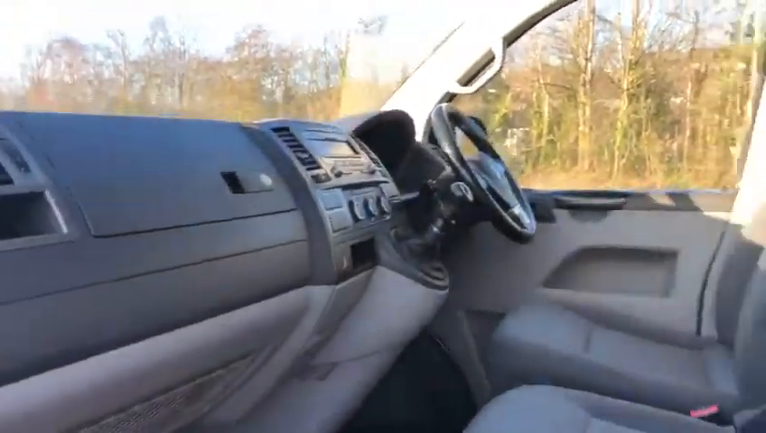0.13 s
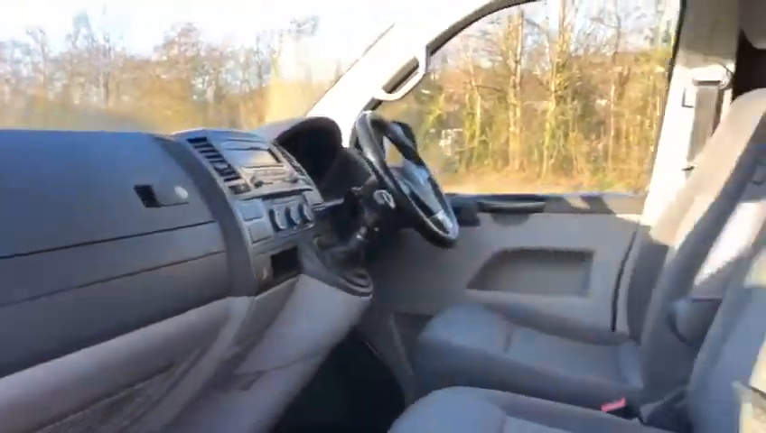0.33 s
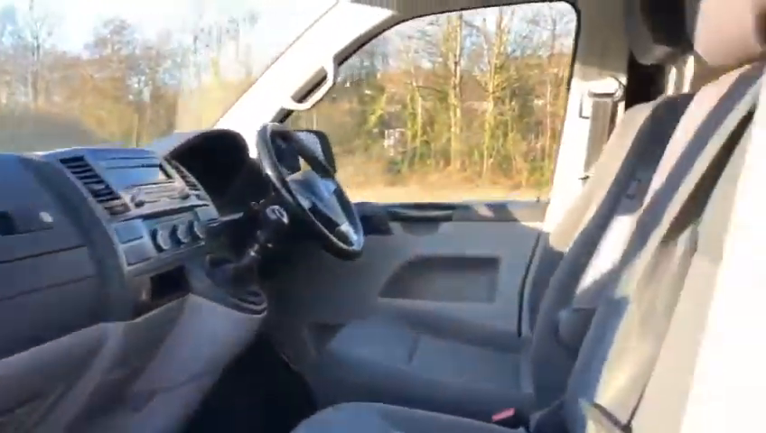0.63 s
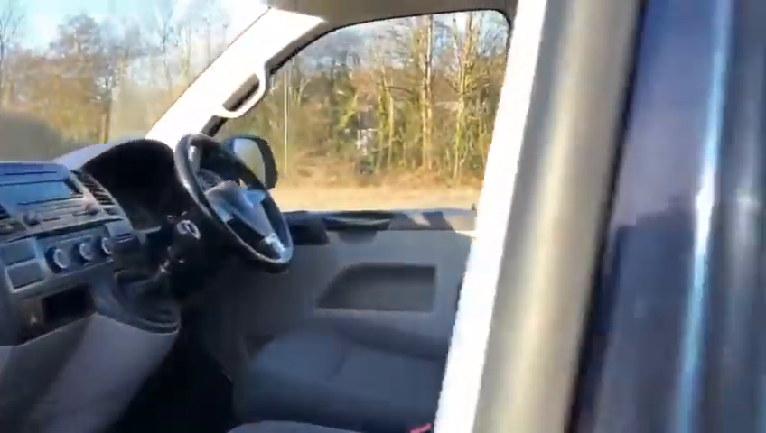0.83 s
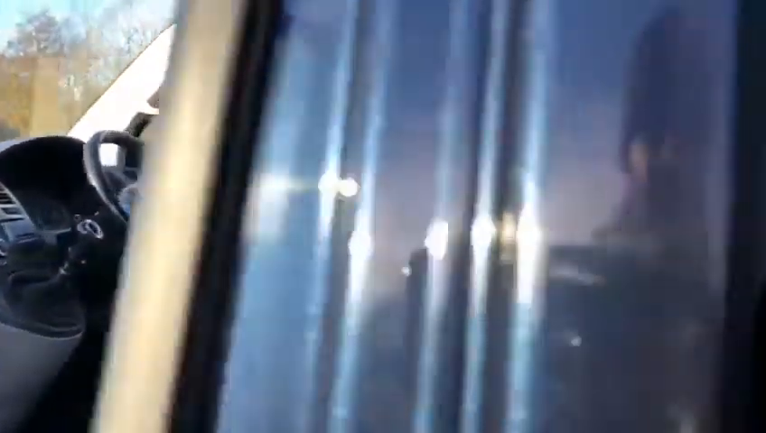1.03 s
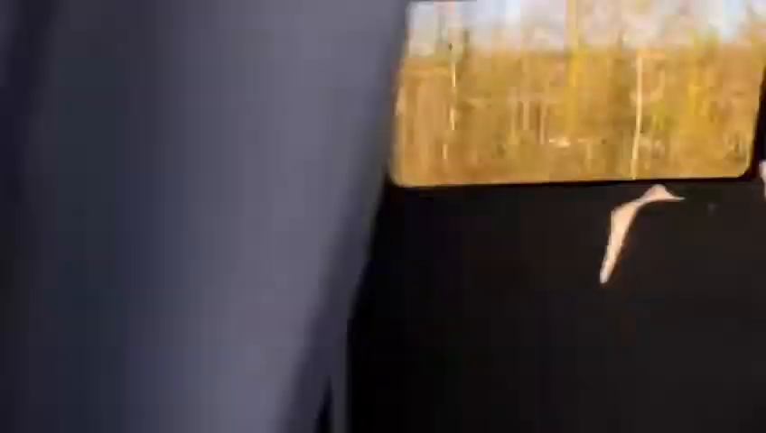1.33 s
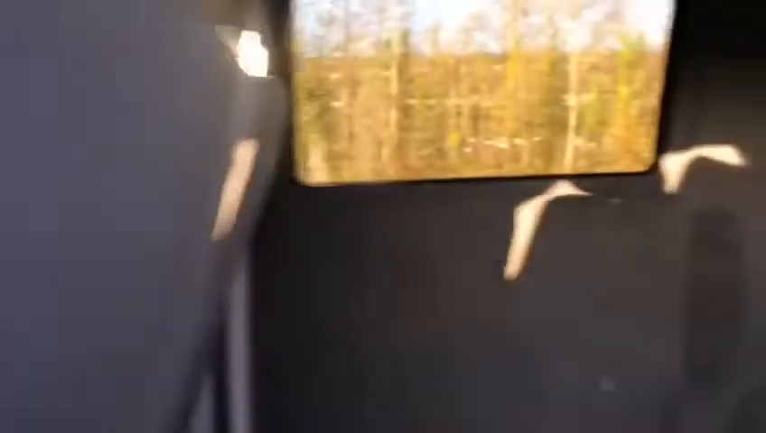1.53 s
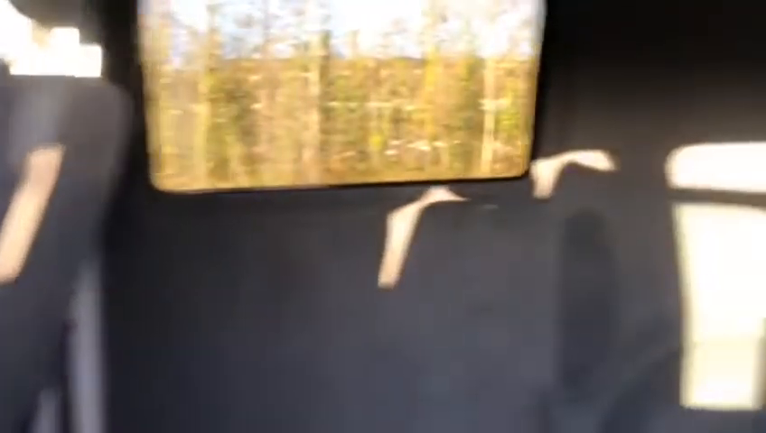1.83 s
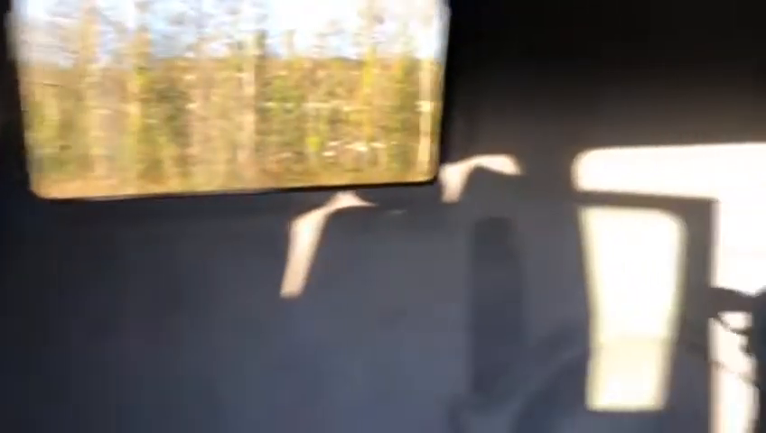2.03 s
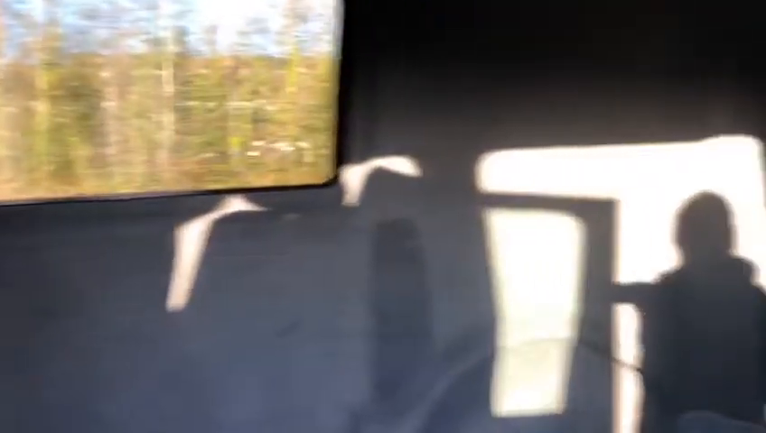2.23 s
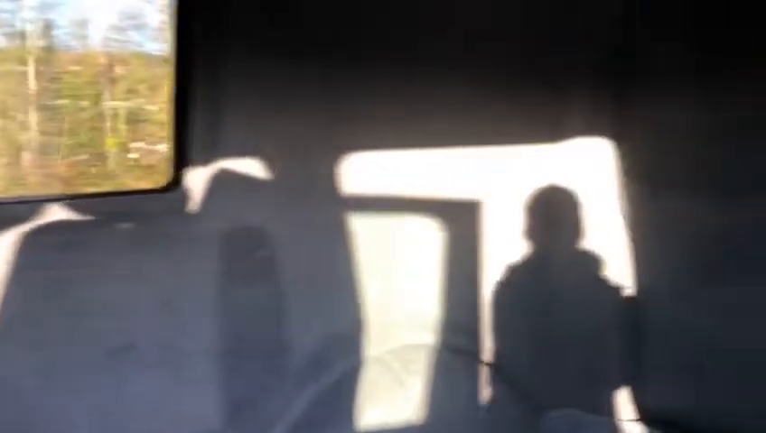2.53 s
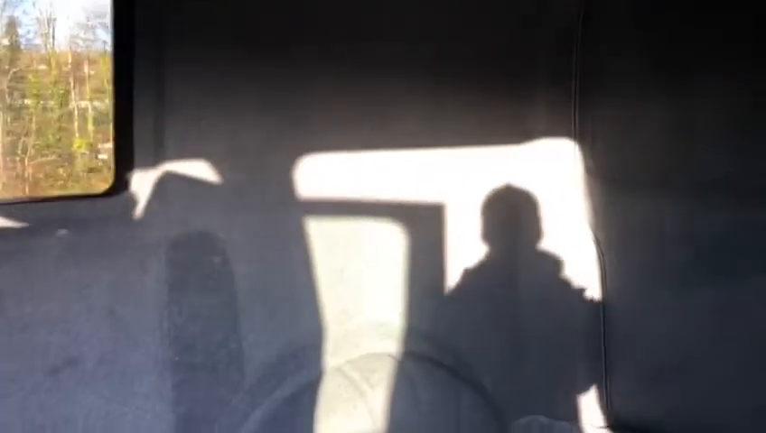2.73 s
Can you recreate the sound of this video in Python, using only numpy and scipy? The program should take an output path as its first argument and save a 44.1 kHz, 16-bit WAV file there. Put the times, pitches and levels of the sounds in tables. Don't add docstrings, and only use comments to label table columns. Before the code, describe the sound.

A van's sliding side door clunks free loudly, then rumbles along its runners with a squeal

```python
import sys
import numpy as np
from scipy import signal
from scipy.fft import rfft, irfft, next_fast_len
from scipy.io import wavfile
from scipy.ndimage import map_coordinates

SR = 44100
rng = np.random.default_rng(int(sys.argv[2]) if len(sys.argv) > 2 else 0)


def volts(x):
    e = np.asarray(x, float) / 20
    return 10 ** e


def store_wav(level_fs):
    pcm = np.round(np.clip(np.atleast_2d(level_fs), -1, 1) * 32767)
    wavfile.write(sys.argv[1], SR, pcm.T.astype(np.int16))


N = 127890

# (frequency [Hz], density [dB per Hz])
AIR_SPECTRUM = [(30, -9.5), (62, -9.5), (300, -25.5), (1360, -28.5), (10300, -56.5), (12000, -52)]
AIR_DB = -46.5

# (middle [s], length [s], level [dB])
CLATTER_BURSTS = [
    (2.47, .05, -41),
    (2.53, .04, -36),
    (2.57, .05, -38),
    (2.62, .08, -39),
    (2.7, .1, -48),
    (.285, .04, -25),
    (.32, .06, -30),
    (1.3, .5, -37),
]
# (frequency [Hz], width [Hz], level [dB])
TRIM_MODES = [(464, 144, 4), (585, 120, 3.5), (760, 260, -3), (1016, 91, -0.5)]
KNOCKS_PER_S = 500

# (middle [s], length [s], pitch [Hz],
# level [dB])
WHISTLES = [(2.403, .03, 10230, -33), (2.418, .04, 2580, -42), (2.41, .02, 5110, -53),
            (2.39, .03, 2450, -49), (2.393, .035, 3950, -47), (2.372, .06, 8900, -49),
            (2.39, .03, 5800, -57), (2.365, .03, 2250, -50), (2.41, .05, 8900, -54),
            (.066, .008, 1190, -33), (2.283, .025, 3750, -53), (.032, .02, 600, -36), (.108, .02, 600, -35),
            (.458, .01, 680, -29), (.277, .008, 1650, -20), (2.575, .025, 3350, -53),
            (2.536, .006, 6200, -50), (1.329, .008, 980, -22), (2.524, .01, 800, -29),
            (.279, .01, 950, -19), (.768, .008, 1300, -38), (.24, .012, 1400, -22)]
# (middle [s], length [s], level [dB])
RASP_BURSTS = [
    (2.39, .12, -53),
    (.15, .16, -54),
    (.79, .08, -56),
    (2.58, .2, -55),
]

# (time [s], peak [dB], low part over it [dB], high part over it [dB], T60
# [s])
TICKS = [(0.0196, -36.5, 8.5, 0.5, 0.045), (0.0277, -46, 20.5, -12.5, 0.014),
         (0.099, -41.5, 20.5, -7, 0.062), (0.2117, -31.5, 4, -14, 0.058),
         (0.215, -14.5, 2.5, -8, 0.089), (.2178, -11.5, -1, -2.5, 0.015),
         (0.2774, -41.5, 7, -5, 0.068), (0.301, -38, -16, 13, 0.056),
         (0.3234, -33.5, -16, -20.5, 0.038), (0.408, -46, -5, -17, 0.033), (.417, -53, -15, 8, 0.15),
         (0.4248, -56, 2, 9, 0.2), (0.4555, -50, 21.5, 1, 0.059), (.463, -44, 2, -3, .05),
         (.566, -59, 0, 5, .03), (0.604, -63, 0, 6, 0.026), (0.6557, -50, 7.5, -7.5, 0.12),
         (.663, -50, 0, 4, .04), (0.705, -52, -4, 2, .04), (.766, -46, 14.5, -2, 0.043),
         (.795, -54, -10, 10, .06), (0.814, -47, -6, 7, 0.033), (0.727, -45.5, 14, -2, 0.03),
         (0.7556, -36, -10, -18, 0.042), (0.8239, -28, 10.5, -7, 0.077), (1.0695, -37, 0, -27, 0.22),
         (1.1387, -32.5, 6, 0, 0.0096), (1.326, -32.5, 17.5, -8, 0.051),
         (1.5946, -48, -7, 4.5, 0.023), (1.6523, -38, 6, -5, 0.058), (1.714, -50.5, 17.5, 3, 0.045),
              (1.9854, -53, -4, 6.5, 0.078), (2.01, -43, -4, -6, 0.087), (2.165, -47.5, 9, 3, 0.046),
              (2.2165, -40, 6, 0.5, .06), (2.277, -37, -1, -18, 0.054), (2.3378, -40.5, 14, -4, 0.032),
              (2.3449, -32, 6, 3, 0.054), (2.412, -30.5, 2, -20, .03), (2.4313, -35.5, 6.5, -4, 0.12),
              (2.46, -44, -11, 3, .02), (2.4655, -25, 0.5, 6.5, 0.035), (2.5207, -40, 12, -1, 0.037),
              (2.5344, -35, 8, -19, 0.05), (2.55, -41, 11, -16, .03), (2.5603, -35, 13.5, -12, 0.066),
              (2.59, -31.5, 8.5, -19, 0.054), (2.6363, -38, 10.5, -32, 0.049),
              (2.6459, -36.5, 5, -31, 0.06)]
# (centre [Hz], width [Hz])
TICK_PARTS = [(2850, 3750), (880, 1570), (7640, 9200)]
TAIL_DB, TAIL_STRETCH, CRACK_T60_S, TICK_DB = -9.5, 2.36, 0.0049, -11

# (start [s], length [s], level [dB], squeal pitch [Hz], squeal over the rub [dB])
CATCHES = [(1.069, 0.035, -48, 1700, -11), (1.12, 0.066, -39.5, 1770, -23), (1.193, 0.035, -32, 1900, -6),
           (1.215, 0.038, -34, 1870, 11), (1.269, 0.045, -33, 1820, 3.5), (1.284, 0.022, -37, 1575, 9),
           (1.305, 0.036, -33.5, 1705, 0.5), (1.364, 0.034, -35.5, 1860, 5.5),
           (1.41, 0.027, -39.5, 1840, -5), (1.445, 0.034, -36, 1630, 2.5), (1.51, 0.046, -42, 1590, -13)]
# (frequency [Hz], density [dB per Hz])
RUB_SPECTRUM = [(300, -28), (600, 7), (1700, 3.5), (2500, -10), (3300, -2), (4800, -14.5), (8500, -17),
                (12000, -23)]
# (frequency [Hz], width [Hz], level [dB])
BRACKET_MODES = [(1540, 120, 1), (1860, 150, 7.5), (2140, 120, 11), (3050, 120, 7.5), (3800, 210, 0)]
SQUEAL_HARMONICS = [2.5, -12.5, -38, -25]
SQUEAL_JITTER, SQUEAL_ROUGHNESS = 0.012, 0.5
DRAG_S, DRAG_LENGTH_S, DRAG_DB = 1.37, 0.49, -40.5
BITE_S, FADE_S, GRIT_DB = 0.0038, 0.018, 3

# (time [s], level [dB])
DOOR_BLOWS = [(0.216, -15), (.229, -7.5), (0.24, -16), (0.251, -14), (.266, -14), (.277, -10.5),
              (0.283, -14), (.298, -23), (0.311, -29), (.325, -18), (0.824, -23), (2.469, -22.5),
              (2.522, -53), (2.561, -23.5)]
# (frequency [Hz], level [dB])
DOOR_MODES = [(75, -2), (117, -6.5), (140, -10), (180, -10.5), (255, -5), (301, -7), (366, -8.5),
              (463, -12.5)]
# (frequency [Hz], density [dB per Hz])
CRUNCH_SPECTRUM = [(300, -26), (600, 10), (1100, -2), (1700, -5.5), (2400, -18), (5000, -38)]
DOOR_T60_S, CRUNCH_T60_S, CRUNCH_DB = 0.14, 0.12, -9.5
BOOM_S, BOOM_HZ, BOOM_DB, BOOM_RISE_S, BOOM_T60_S = 0.2235, 41.5, 2, 0.039, 0.4

# (time [s], roller force [dB], load bay drumming over it [dB], body sway over it [dB])
ROLL_COURSE = [(0, -57.5, -6, 0), (0.031, -38.5, -18, -9), (0.198, -37.5, -6, -1), (.38, -33.5, 5, 8.5),
               (.52, -36.5, -22, 10), (0.661, -30, -6.5, -7), (.8, -29.5, 6, 2), (.95, -30.5, 2.5, 6),
               (1.2, -26, -3, -16), (1.45, -25.5, 7.5, -27), (1.75, -31, 5.5, -8), (1.98, -28.5, 5, -9),
               (2.15, -30.5, 0.5, -1), (2.28, -31, 13, -3), (2.5, -32, 5, 7.5), (2.64, -35, 8, 7),
               (2.76, -44, 2.5, 12.5), (2.9, -59.5, 11, 19.5)]
# (frequency [Hz], density [dB per Hz])
PANEL_SPECTRUM = [(90, -6), (165, -3.5), (255, -10.5), (520, -10.5), (640, -17.5), (2000, -36),
                  (5000, -49.5), (12000, -58.5)]
# (frequency [Hz], width [Hz], level [dB])
PANEL_MODES = [(255, 57, -2), (770, 135, -5.5), (3430, 200, -28)]
# (frequency [Hz], width [Hz], level [dB])
BAY_MODES = [(113.5, 22.4, 4.5), (135.7, 10.3, -1)]
# (frequency [Hz], width [Hz], level [dB])
SWAY_MODES = [(38, 6.9, -12), (69, 46, -12.5)]
BUMPS_PER_S, BUMP_SPREAD_DB, LUMP_DB = 2500, 2.5, 0.9
SHIFT_DB = 3


def unit(x):
    return x / np.sqrt(np.mean(x ** 2) + 1e-20)


def noise():
    return rng.standard_normal(N)


def wobble(rate):
    knots = rng.standard_normal(int(N * rate / SR) + 4)
    return map_coordinates(knots, [np.arange(N) * rate / SR])


def filtered(x, response):
    m = next_fast_len(x.shape[-1] + SR // 2)
    spectrum = rfft(x, m) * response(np.fft.rfftfreq(m, 1 / SR))
    return irfft(spectrum, m)[..., :x.shape[-1]]


def colour(points):
    f, db = np.transpose(points)
    return lambda hz: volts(np.interp(np.log(hz + 1), np.log(f + 1), db))


def peaks(rows):
    def response(f):
        return sum((-1) ** k * volts(db) * 1j * f * width / (hz * hz - f * f + 1j * f * width)
                   for k, (hz, width, db) in enumerate(rows))
    return response


def swell(middle, length):
    return np.exp(-2 * ((np.arange(N) / SR - middle) / (length / 2)) ** 2)


def car_park_air():
    return volts(AIR_DB + 0.21 * wobble(5.4)) * unit(filtered(noise(), colour(AIR_SPECTRUM)))


def clatter():
    taps = (rng.random(N) < KNOCKS_PER_S / SR) * noise()
    strike = unit(taps) + 0.6 * noise()
    knocks = unit(filtered(strike, lambda f: peaks(TRIM_MODES)(f) * peaks([(800, 1200, 0)])(f)))
    return knocks * sum(volts(db) * swell(s, length) for s, length, db in CLATTER_BURSTS)


def squeaks():
    drift = np.cumsum(1 + 0.006 * wobble(150)) / SR
    whistles = np.zeros(N)
    for s, length, hz, db in WHISTLES:
        roughness = unit(1 + 0.7 * wobble(300))
        whistles += volts(db) * swell(s, length) * roughness * np.sin(2 * np.pi * hz * drift)
    rasp = unit(filtered(noise(), peaks([(2200, 1500, 0), (4300, 400, -6), (7500, 5000, -12)])))
    grain = volts(2.2 * wobble(90))
    return whistles + grain * rasp * sum(volts(db) * swell(s, length) for s, length, db in RASP_BURSTS)


def ticks():
    out, t = np.zeros(N + SR), np.arange(SR // 6) / SR
    for s, db, low_db, high_db, t60 in TICKS:
        t60 = max(t60, 0.01)
        tail = volts(TAIL_DB - 60 * t / (TAIL_STRETCH * t60))
        crack = 3 * volts(-60 * t / CRACK_T60_S)
        shape = volts(-60 * t / t60) + tail + crack
        shape = shape * (1 - np.exp(-t / 0.0006))
        rings = peaks([(hz, hz / 12, 1.5) for hz in 600 * 16 ** rng.random(7)])
        parts = []
        for hz, width in TICK_PARTS:
            hiss = rng.standard_normal(len(t)) * shape
            parts.append(filtered(hiss, lambda f: peaks([(hz, width, 0)])(f) ** 3
                                  * np.sqrt(SR / width) * (0.87 + rings(f))))
        out[round(s * SR):][:len(t)] += volts(db + TICK_DB) * (volts([0, low_db, high_db]) @ parts)
    return out[:N]


def grind(rings):
    grit = noise() * volts(GRIT_DB * wobble(350))
    return unit(filtered(grit, lambda f: colour(RUB_SPECTRUM)(f) * (1 + abs(peaks(BRACKET_MODES + rings)(f)))))


def dry_roller():
    t = np.arange(N) / SR
    drift = 1 + SQUEAL_JITTER * wobble(300)
    lumps = [unit(1 + SQUEAL_ROUGHNESS * wobble(200)) for _ in SQUEAL_HARMONICS]
    out = volts(DRAG_DB + 1.5 * wobble(45.0)) * swell(DRAG_S, DRAG_LENGTH_S) * grind([])
    scrapes = []
    for _ in range(4):
        ring_hz = [8650, *rng.uniform(5000, 10000, size=3)]
        scrapes.append(grind([(hz, 200, 6) for hz in ring_hz]))
    for k, (s, length, db, hz, squeal_db) in enumerate(CATCHES):
        phase = 2 * np.pi * np.cumsum(hz * drift) / SR
        squeal = sum(volts(level) * lumps[j] * np.sin((j + 1) * phase)
                     for j, level in enumerate(SQUEAL_HARMONICS))
        bite = np.clip((t - s) / BITE_S, 0, 1) * np.exp(-np.clip(t - s - length, 0, None) / FADE_S)
        slip = swell(s + length / 2, 1.6 * length) * volts(squeal_db)
        out += volts(db) * (bite * scrapes[k % 4] + slip * squeal)
    return out


def clunk():
    out, t = np.zeros(N + SR), np.arange(SR) / SR
    for s, db in DOOR_BLOWS:
        ring = np.zeros(SR)
        for hz, level in DOOR_MODES:
            decay = volts(level + rng.normal(0, 5.1) - 60 * t / DOOR_T60_S)
            ring += decay * np.sin(2 * np.pi * hz * rng.normal(1, 0.033) * t) * rng.choice([-1, 1])
        rubble = unit(filtered(rng.standard_normal(SR), colour(CRUNCH_SPECTRUM)))
        crunch = volts(CRUNCH_DB - 60 * t / CRUNCH_T60_S) * rubble
        out[round(s * SR):][:SR] += volts(db) * (ring + crunch)
    boom = volts(BOOM_DB - 60 * t / BOOM_T60_S) * (1 - np.exp(-(t / BOOM_RISE_S) ** 2))
    out[round(BOOM_S * SR):][:SR] += boom * np.sin(2 * np.pi * BOOM_HZ * t)
    return out[:N]


def rolling():
    s, force_db, bay_db, sway_db = np.transpose(ROLL_COURSE)

    def course(db):
        return volts(np.interp(np.arange(N) / SR, s, db))

    bumps = (rng.random(N) < BUMPS_PER_S / SR) * noise() * volts(BUMP_SPREAD_DB * noise())
    bumps = unit(bumps) + 0.85 * noise()
    plain = filtered(bumps, lambda f: colour(PANEL_SPECTRUM)(f) * (1 + abs(peaks(PANEL_MODES)(f))))
    panel = plain
    for _ in range(3):
        mode_hz = 235 * 2.35 ** np.sort(rng.random(12))[::2]
        place = filtered(plain, peaks([(hz, 14, 1) for hz in mode_hz]))
        panel = panel + volts(SHIFT_DB * wobble(5.03)) * place
    panel = volts(3.5 + LUMP_DB * wobble(13.9)) * unit(panel)
    bay = unit(filtered(noise(), lambda f: peaks(BAY_MODES)(f) * peaks([(120, 60, 0)])(f)))
    sway = unit(filtered(noise(), lambda f: peaks(SWAY_MODES)(f) * peaks([(48, 50, 0)])(f)))
    return course(force_db) * (panel + course(bay_db) * volts(0.5) * bay + course(sway_db) * volts(-2.0) * sway)


def scene():
    return (car_park_air() + clatter() + squeaks() + ticks() + dry_roller() + clunk() + rolling())[None]


def band_limit(x):
    return signal.sosfilt(signal.butter(12, 12290, fs=SR, output="sos"), x)


def record(dry):
    clipped = dry / (1 + abs(dry / 0.95) ** 6) ** (1 / 6)
    mix = filtered(clipped, lambda hz: np.clip((12250 - hz) / 1000, 0, 1) ** 1.8)
    return band_limit(mix)


dry = scene()
out = record(dry)
store_wav(out)
```